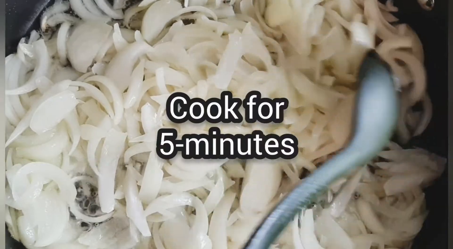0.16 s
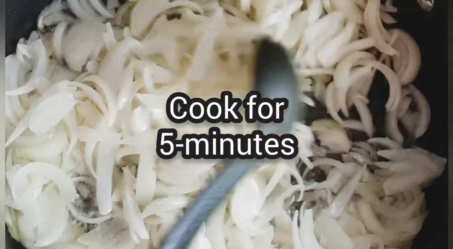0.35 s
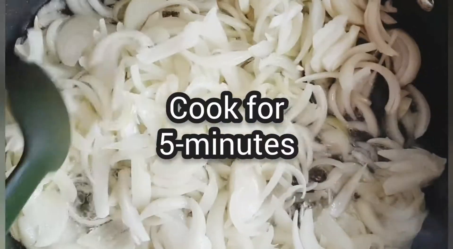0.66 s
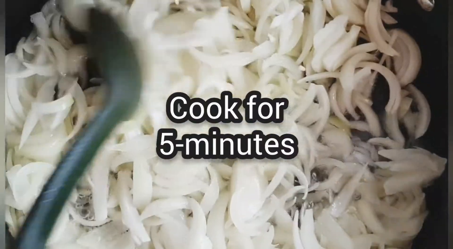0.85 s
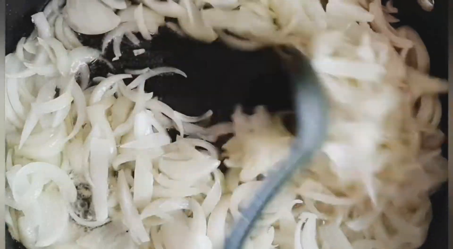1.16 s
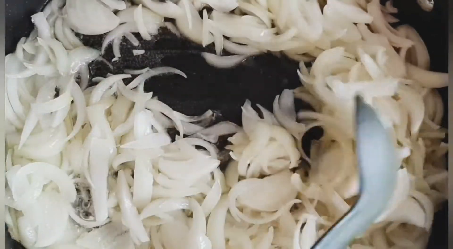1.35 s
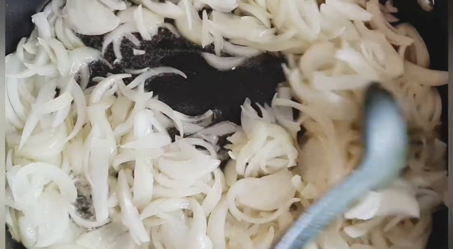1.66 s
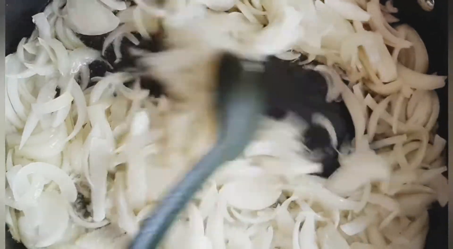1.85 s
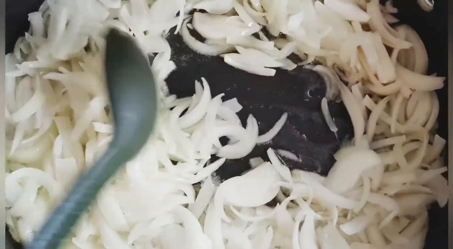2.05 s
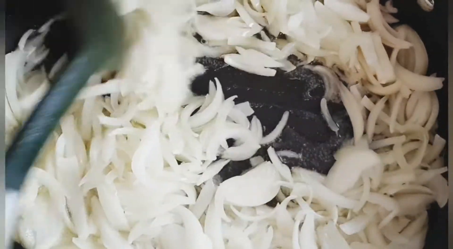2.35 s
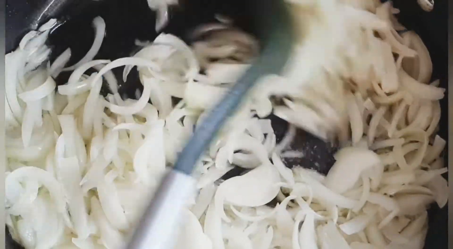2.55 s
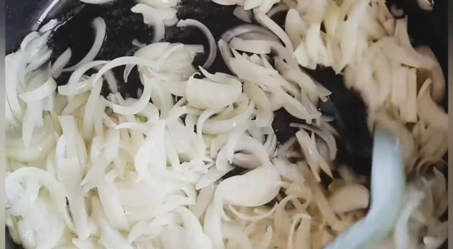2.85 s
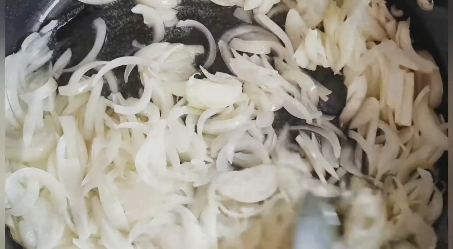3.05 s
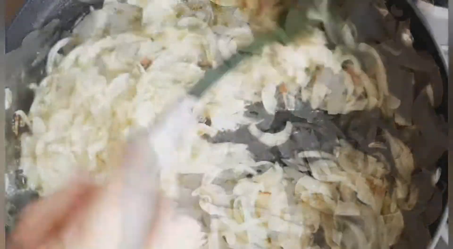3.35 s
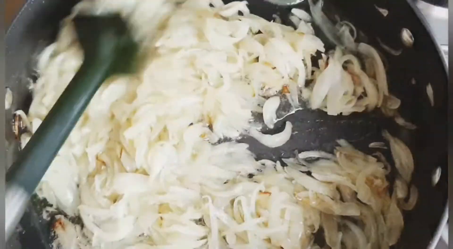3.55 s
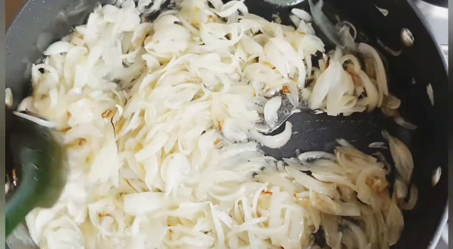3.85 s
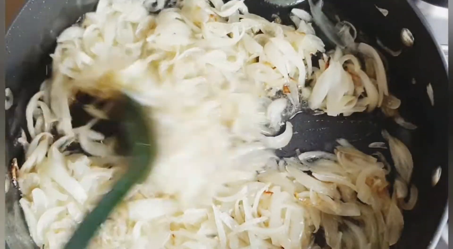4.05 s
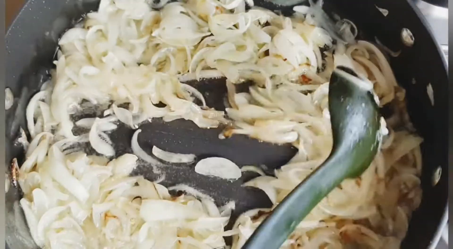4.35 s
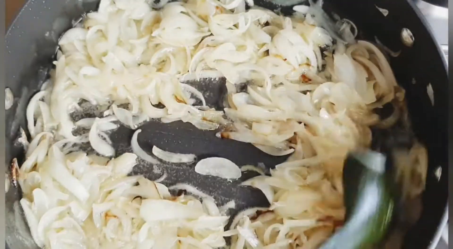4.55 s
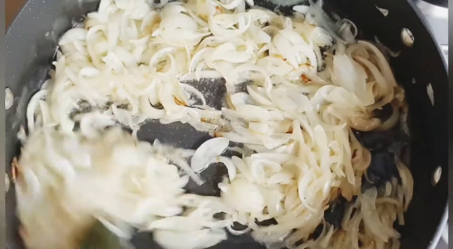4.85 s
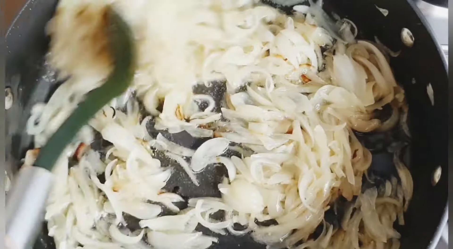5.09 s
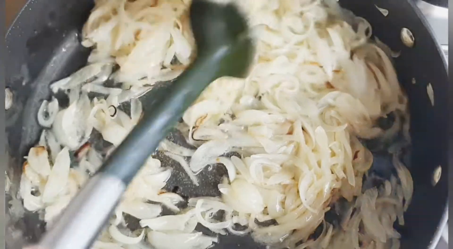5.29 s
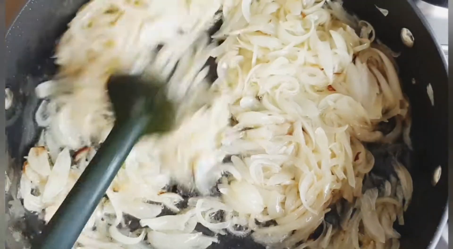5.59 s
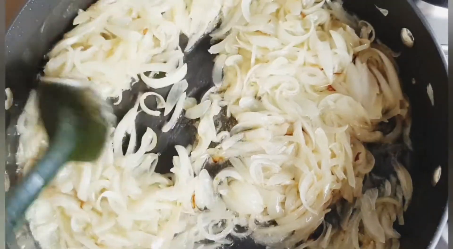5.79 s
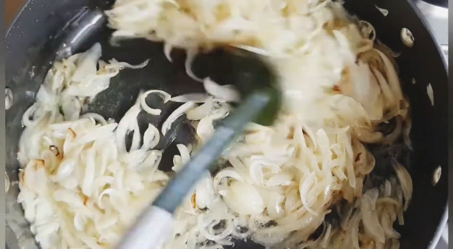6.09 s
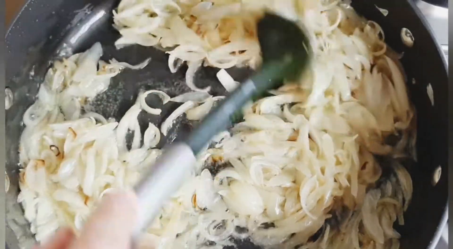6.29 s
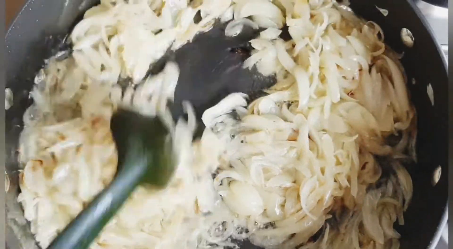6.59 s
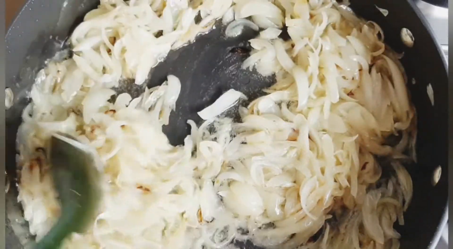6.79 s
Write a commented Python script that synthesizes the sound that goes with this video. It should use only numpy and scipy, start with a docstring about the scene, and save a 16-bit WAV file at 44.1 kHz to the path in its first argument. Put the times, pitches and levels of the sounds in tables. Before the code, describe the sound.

Close, bright frying hiss of onions grows drier and spittier while a soft-edged spatula stirs, scrapes and taps the pan.

```python
"""In a kitchen, sliced onions fry in hot oil in a deep pan, heard from close above by two microphone ports.
Water flashing to steam makes the sizzle, as filtered noise in countless tiny bursts, and some big spits.
A spatula drags over the pan floor (grainy noise), chatters (narrow noise) and knocks (pulses into resonances).
Rising steam buffets mostly the right port (low noise), two droplets strike the ports (single pulses),
and the kitchen hums below (low noise and narrow bands)."""
import sys
import numpy as np
from scipy import signal
from scipy.fft import rfft, irfft, next_fast_len
from scipy.io import wavfile
from scipy.ndimage import uniform_filter1d

SR = 44100
rng = np.random.default_rng(int(sys.argv[2]) if len(sys.argv) > 2 else 0)


def dump_mix(stems):
    """Bounce the given channels to the path in sys.argv[1] as a 16-bit WAV at rate SR."""
    frames = np.atleast_2d(stems).T  # one column per channel
    limited = np.clip(frames, -1, 1)  # hard clip at full scale
    pcm = np.round(limited * 32767).astype(np.int16)
    wavfile.write(sys.argv[1], SR, pcm)


N = 305613  # length of the scene in samples

# colour of the low room noise: f/Hz, density/dB per Hz
KITCHEN_SPECTRUM = [(15, -37), (25, -18), (54, 4.5), (75, -6.5), (124, 0.5), (204, -14.5), (276, -7.5),
                    (400, -2.5), (520, -11.5), (880, -120)]
KITCHEN_LEVEL_DB = -59.5
# wavering hums: f/Hz, width/Hz, rms level/dB
HUMS = [(49.9, 5.7, -70), (634.5, 8, -65)]
# gusts of steam on the right port: t of the top/s, half length/s, level before the last filter/dB
STEAM_GUSTS = [(0.01, .03, -51), (0.35, 0.12, -51.5), (0.57, 0.026, -52), (0.74, 0.023, -47),
               (0.846, 0.045, -38), (0.992, 0.017, -37), (1.203, 0.037, -50), (1.628, 0.057, -39.5),
               (1.818, .03, -47), (1.93, 0.1, -47), (2.38, 0.12, -45.5), (3.012, 0.066, -44.5),
               (3.407, 0.038, -50)]
# droplets on the ports, before filtering: t/s, signed height left, signed height right, width/ms
DROPLET_HITS = [(0.873, -0.012, .06, 0.62), (6.7519, -0.51, 0.023, 0.16)]
# spatula knocks on the pan: t/s, push level before the filters/dB, ring against push/dB, left-right/dB
SPATULA_KNOCKS = [(1.010, -32, -6, -1.0), (1.407, -30.5, -6, 1), (1.706, -36, 12, 0), (2.38, -26, -21, 9),
                  (3.913, -27.5, -26, -1), (4.300, -39, 0, 10), (4.640, -32, -4, 12),
                  (5.100, -33.5, -8, 12), (5.375, -35, 7, -1), (5.558, -31, -1, -7), (5.682, -35, -16, 17),
                  (6.058, -28.5, 7, 1.0), (6.120, -25.5, -19, -1.0), (6.624, -36, -2, 1.0),
                  (6.644, -26.5, 4, 0.0)]
# resonances of the pan body: f/Hz, width/Hz, level/dB
PAN_MODES = [(638, 93, -10.5), (830, 64, -6), (1023, 146, -4.5), (1480, 51, 3), (1551, 61, -1),
             (2047, 57, 0.5)]
# short pitched strokes of the spatula edge: t/s, length/s, start f/Hz, end f/Hz, width/Hz, level/dB
EDGE_STROKES = [(1.28, 0.13, 110, 111, 49.8, -55.5), (2.352, 0.098, 243, 255, 70, -52),
                (3.99, 0.14, 920, 743, 170, -46), (4.33, 0.063, 122, 118, 60, -60),
                (4.456, 0.13, 131, 122, 60, -55.5), (4.636, 0.08, 265, 273, 100, -50),
                (5.656, 0.079, 170, 170, 100, -63), (6.829, 0.15, 744, 1015, 200, -45.5)]
# onions shifting on the pan floor all the while: t/s, hollow level/dB, ringing level before damping/dB
ONION_RUB = [(0.0, -49.5, -41), (1.2, -47.5, -41), (2.3, -48, -41), (2.9, -51.5, -42), (3.7, -55.5, -44),
             (4.3, -51.5, -39), (5.0, -52.5, -41), (5.8, -50.5, -42.5), (6.93, -53.5, -42)]
# drags of the spatula over the floor: t of the top/s, rise/s, fall/s, hollow level/dB, ringing level/dB
SPATULA_DRAGS = [(2.386, .01, 0.091, -45, -75), (2.53, 0.086, 0.13, -32, -75), (3.33, .02, 0.053, -60, -44),
                 (3.672, 0.016, 0.026, -51, -43.5), (3.84, 0.025, .03, -61, -42.5),
                 (3.93, 0.019, .04, -51, -60), (4.31, 0.063, 0.094, -80, -40), (4.53, .06, 0.066, -54, -51),
                 (4.65, .015, 0.14, -53, -35), (4.82, 0.12, 0.062, -44.5, -38),
                 (5.0, 0.014, 0.03, -50, -44), (5.11, 0.03, 0.044, -69, -39), (5.21, 0.025, 0.11, -64, -48),
                 (5.995, .07, 0.034, -36.5, -32.5), (6.06, .015, 0.018, -50, -43),
                 (6.13, 0.018, 0.035, -48, -43.5), (6.21, 0.013, 0.058, -60, -43),
                 (6.64, 0.016, 0.014, -47, -44), (6.93, 0.035, 0.024, -50, -59)]
# colour of the hollow rush in the pan's cup: f/Hz, density/dB per Hz
HOLLOW_SPECTRUM = [(120, -58), (200, -28), (404, -15), (470, -3), (604, -1.5), (715, -2), (877, -3),
                   (1040, -8), (1280, -10), (1500, -18), (1800, -30), (2530, -100)]
# big spits of oil: t/s, peak level/dB, centre f/Hz, left-right/dB, puff against crack/dB
OIL_SPITS = [(0.625, -19.5, 6300, 2, -11), (0.8717, -9.5, 12800, -4, -15), (0.9395, -25, 4140, -10, -14),
             (0.982, -20, 4120, -4, -12), (1.8705, -19.5, 13800, -5, -7), (2.2507, -21, 2680, -1, -7),
             (2.544, -22, 4000, -8, -7), (3.0702, -21.5, 3470, 1, -7), (3.3348, -26, 4420, -6, -7),
             (3.645, -13, 15100, 2, -5), (3.8316, -22, 7680, -4, -7), (4.1728, -17, 12800, 1, -5),
             (4.2397, -19, 10800, 0, -7), (4.4232, -19, 7180, 2, -7), (4.471, -19, 5340, -1, -3),
             (4.511, -12, 13800, 1, -7), (4.823, -20, 3520, -1, -5), (4.832, -16, 7030, -1, -10),
             (4.862, -15, 9000, -1, -10), (5.048, -18.5, 3460, -1, -5), (5.0991, -14, 3180, 0, -12),
             (5.284, -14, 6760, 1, -4), (5.402, -13.5, 7100, 1, -4), (5.653, -19.5, 5630, -1, -7),
             (5.676, -12, 14800, 0, -7), (5.712, -17.5, 6840, -2, -4), (5.84, -18, 5700, 0, -2),
             (6.0057, -15.5, 11600, -3, -6), (6.098, -15.5, 5530, -4, -9), (6.1518, -19.5, 6860, -5, -1),
             (6.2061, -15, 5500, -3, -7), (6.286, -19.5, 5640, -3, -5), (6.3808, -19, 7160, 2, -7),
             (6.4882, -14, 13000, -1, -7), (6.521, -17, 4870, 1, -12), (6.6446, -12.5, 6800, -1, -6),
             (6.7006, -20, 13100, 0, -5), (6.8418, -17, 11850, -1, -4), (6.8645, -23, 3540, 0, -7)]
SPIT_BROAD_SHARE = .22  # part of a spit that spans a wide range of pitches
# the frying before flares: t/s, sizzle level/dB, level of the top against it/dB
FRYING = [(0.0, -39.5, -1.5), (0.46, -40.5, -1), (0.83, -40, 2), (0.95, -37, 0.5), (1.3, -36.5, 1.5),
          (1.62, -40.5, 1), (1.8, -37, 0), (2.07, -39.5, -0.5), (2.45, -36.5, -0.5), (3.28, -40, -1.5),
          (3.5, -38.5, -0.5), (4.1, -37.5, -1.5), (4.65, -35.5, -1), (4.85, -31.5, 1), (4.96, -36.5, 1),
          (5.02, -33, -0.5), (5.6, -35.5, 1.5), (5.72, -35, 0.5), (5.92, -36, 0), (6.18, -36.5, -1),
          (6.45, -36.5, 1), (6.7, -37.5, -0.5), (6.93, -34.5, -1.5)]
# colours of the sizzle, the first heard early on, the second later; each: f/Hz, density/dB per Hz
SIZZLE_SPECTRA = [(1060, -42), (1800, 0), (1990, 3), (2220, -1), (3480, 0), (4250, 1.5), (8750, -13.5),
                  (11800, -5), (15100, -13.5), (16000, -2)], [(1060, -6), (1800, -10.5), (2050, -13),
                  (2410, -4.5), (2790, -2.5), (7420, 2), (8670, -13.5), (11500, -4), (15100, -5),
                  (16000, 0)]
# flares where wet onion meets bare pan, and a few short dips: t of the top/s, change of level/dB
SIZZLE_FLARES = [(0.77, 2), (1.35, 4.5), (1.75, 2.5), (2.27, 3), (4.15, 4), (4.38, -0.5), (4.82, 2.5),
                 (5.29, 2), (5.34, 2), (5.52, 3), (6.02, 5), (6.1, -2.5), (6.16, -2), (6.21, 1.5),
                 (6.52, 3), (6.64, 4.5), (6.76, 2)]
FLARE_RISE_S, FLARE_FALL_S, FLARE_TREBLE_SHARE = 0.011, 0.021, .3
# stage of the scene: t/s, share of the later character from 0 to 1, left-right of the sizzle/dB
SCENE_STAGE = [(0, 0.6, -1.5), (1.2, 0.45, -3), (3.1, 0.52, -1.7), (3.5, 0.72, -0.5), (6.93, 0.82, 0)]
TOP_FROM_HZ, CUTOFF_HZ = 8250, 15780  # where the sizzle's top begins; where the whole sound is cut


def from_db(db):
    """Decibels to gain."""
    return 10 ** (np.asarray(db) / 20)


def rms_one(x):
    """Scaled to rms 1."""
    return x / np.sqrt(np.mean(x ** 2) + 1e-20)


def in_time(rows):
    """Each column of a curve table at every sample."""
    s, *columns = np.transpose(rows)
    return [np.interp(np.arange(N) / SR, s, column, right=column[-1]) for column in columns]


def drift(rate):
    """Slow random wandering of spread 1; a higher rate in Hz wanders faster."""
    r = np.exp(-80 * np.pi * rate / SR)  # computed at every 40th sample only
    white = rng.standard_normal(N // 40 + 2002)
    slow = signal.lfilter([1], [1, -2 * r, r * r], white)[2000:]
    return np.interp(np.arange(N) / 40, np.arange(len(slow)), rms_one(slow))


def colour(x, spectrum):
    """Gives white sound a spectrum; rms 1."""
    size = next_fast_len(N)
    hz, db = np.transpose(spectrum)
    bin_hz = np.arange(1, size // 2 + 2) * SR / size
    gain = from_db(np.interp(np.log(bin_hz), np.log(hz), db, left=-90, right=-90))
    return rms_one(irfft(rfft(x, size) * gain, size)[..., :N])


def band(x, low_hz, high_hz, order=2):
    """Keeps the pitches between two limits (Butterworth band-pass)."""
    sos = signal.butter(order, [low_hz, min(high_hz, .45 * SR)], "band", fs=SR, output="sos")
    return signal.sosfilt(sos, x)


def pair(alike):
    """Two white noises, left and right, with the given likeness."""
    mid, side = rng.standard_normal((2, N))
    alike = np.clip(alike, 0, 1)
    return np.sqrt((1 + alike) / 2) * mid + np.sqrt((1 - alike) / 2) * side * [[1], [-1]]


def bursts(per_s, spread_db, decay_ms):
    """Power envelope of random sudden bursts that die fast, mean 1."""
    sizes = from_db(2 * spread_db * np.minimum(rng.exponential(1, N), 3))
    starts = sizes * (rng.random(N) < per_s / SR)
    power = signal.lfilter([1], [1, -np.exp(-1000 / (decay_ms * SR))], starts + 1e-12)
    return power / power.mean()


def sides(pan_db):
    """Left and right gain."""
    return from_db(np.array([[pan_db], [-pan_db]]) / 2)


def narrow(hz, width, size):
    """Noise in a narrow band whose centre follows hz sample by sample; rms 1."""
    lowpass = signal.butter(2, width / 2, fs=SR, output="sos")
    slow = signal.sosfilt(lowpass, rng.standard_normal((2, size + 8000)))[:, 8000:]
    turning = np.exp(2j * np.pi * np.cumsum(hz * np.ones(size)) / SR)
    return rms_one(np.real((slow[0] + 1j * slow[1]) * turning))


def swells(tops_s, heights, rise_s, fall_s):
    """Peaked swells summed; each is near a third of its height rise_s before and fall_s after its top."""
    late = np.arange(0, N + 32, 32) / SR - np.reshape(tops_s, (-1, 1))  # every 32nd sample is enough
    span = np.where(late < 0, np.reshape(rise_s, (-1, 1)), np.reshape(fall_s, (-1, 1)))
    curve = heights @ np.exp(-np.abs(late / span) ** 1.5)
    return np.interp(np.arange(N) / 32, np.arange(late.shape[1]), curve)


def kitchen():
    """Low room noise, nearly alike at both ports, and wavering hums."""
    hum = sum(from_db(db) * narrow(hz, width, size=N) for hz, width, db in HUMS)
    return from_db(KITCHEN_LEVEL_DB) * colour(pair(0.86), KITCHEN_SPECTRUM) + hum


def buffeting():
    """Rising steam flaps the ports, mostly the right, one slow push after another; it ends midway."""
    flap = band(rng.standard_normal((2, N)), 38, 96)
    flap = flap / np.sqrt(uniform_filter1d(flap ** 2, size=1200) + 1e-9)  # pushes of even size
    s, half_s, db = np.transpose(STEAM_GUSTS)
    gusts = flap * swells(s, from_db(db), half_s, half_s)
    return band(gusts, 23, 150) * from_db([[-14.], [0]])


def droplets():
    """One-sided pressure pulses; the membrane swings back slowly."""
    t = np.arange(N) / SR
    out = np.zeros((2, N))
    for s, left, right, ms in DROPLET_HITS:
        pulse = np.exp(-((t - s) * 2000 / ms) ** 2)
        out += pulse * np.array([[left], [right]])
    return band(out, 110, 9000, order=1)  # the lower limit makes the swing back


def pan_body(x):
    """The pan's resonances side by side, each ringing at its own pitch."""
    out = 0
    for k, (hz, width, db) in enumerate(PAN_MODES):
        r = np.exp(-np.pi * width / SR)
        ringing = signal.lfilter([1 - r, 0, r - 1], [1, -2 * r * np.cos(2 * np.pi * hz / SR), r * r], x)
        out = out + (-1) ** k * from_db(db) * ringing
    return out


def knocks():
    """A soft plastic edge: a dull push heard directly and through the pan's modes."""
    push, strike = np.zeros((2, 2, N))
    for s, db, ring_db, pan_db in SPATULA_KNOCKS:
        at = [round(s * SR)]
        push[:, at] = from_db(db) * sides(pan_db)
        strike[:, at] = push[:, at] * from_db(ring_db)
    return 22.0 * band(push, 335, 1330) + 26.0 * pan_body(strike) + 2.8 * band(strike, 1000, 2200)


def strokes():
    """The spatula edge chatters at a gliding pitch, swelling fast and fading."""
    out = np.zeros(N + SR)
    for s, length, start_hz, end_hz, width, db in EDGE_STROKES:
        gone = np.arange(14000) / SR / length  # share of the stroke gone by
        shape = np.sin(np.pi * np.clip(gone, 0, 1) ** 1.05) ** 0.32
        chatter = narrow(start_hz + (end_hz - start_hz) * gone, width, size=len(gone))
        at = round(s * SR)
        out[at:at + len(gone)] += from_db(db) * shape * chatter
    return out[:N]


def drags():
    """Gains of the friction: hollow part, steady ringing part, and the ringing that the drags add."""
    s, rise_s, fall_s, hollow_db, ring_db = np.transpose(SPATULA_DRAGS)
    steady_hollow, steady_ring = from_db(in_time(ONION_RUB))
    hollow = steady_hollow + swells(s, from_db(hollow_db), rise_s, fall_s)
    return hollow, steady_ring, swells(s, from_db(ring_db), rise_s, fall_s)


def rubbing(hollow_gain, ring_gain, drag_gain, dry):
    """Grainy friction: a hollow rush from the pan's cup, and its modes, which ring stronger later on."""
    rush = pair(0.64) * np.sqrt(0.5 + .5 * bursts(per_s=90., spread_db=5.5, decay_ms=9.6))
    hollow = colour(rush, HOLLOW_SPECTRUM)
    grain = pair(0.28) * np.sqrt(1 + 0.4 * bursts(per_s=120., spread_db=6.0, decay_ms=4.6))
    ringing = rms_one(band(pan_body(grain), 1130, 2400))
    modes = (0.16 + 0.85 * dry ** 2) * from_db(2.8 * drift(4.0)) * ringing
    scratch = (.7 - 0.25 * dry) * rms_one(band(grain, 995, 2680))
    # the spatula on bare metal: a denser rasp, heard through the modes only
    rasp = pair(0.45) * np.sqrt(1.5 + 0.7 * bursts(per_s=230.0, spread_db=-0.5, decay_ms=6.0))
    drag = rms_one(band(pan_body(rasp), 950, 2080))
    return hollow_gain * hollow + ring_gain * (modes + scratch) + drag_gain * drag


def spits():
    """The bubble cracks, then a short puff of noise around its pitch dies away."""
    out, t = np.zeros((2, N + 1000)), np.arange(1000) / SR
    noises = rng.standard_normal((len(OIL_SPITS), 2, 1000))
    for (s, db, hz, pan_db, puff_db), noise in zip(OIL_SPITS, noises):
        noise[:, 0] = 3.0 * np.sign(noise[0, 0])  # a strong first sample, the same at both ports
        crack_decay, puff_decay = np.exp(-t / 0.00012), np.exp(-t / 0.011)
        spit = noise * (crack_decay + from_db(puff_db) * puff_decay)
        spit = band(spit, hz / 1.3, hz * 1.264) + SPIT_BROAD_SHARE * band(spit, 1900, 12800)
        at = round(s * SR)
        out[:, at:at + 1000] += from_db(db) * sides(pan_db) * spit / np.abs(spit).max()
    return out[:, :N]


def sizzle(level_db, bright_db, flare_db, dry):
    """Each third-octave holds a fine hiss, bubbles of its own size bursting, and bursts that span all bands."""
    white, out = rng.standard_normal((2, 2, N)), 0  # the ports hear unrelated detail but the same bursts
    wide, together = bursts(per_s=22.0, spread_db=12.5, decay_ms=1.3), drift(19.0)
    edges_hz = 1500 * 2 ** np.arange(0, 4, 1 / 3)
    for k, (low, high) in enumerate(zip(edges_hz, edges_hz[1:])):
        own = bursts(per_s=50., spread_db=6.5, decay_ms=0.33)
        wander_db = 0.82 * together + 1.48 * drift(20.6)
        gain = np.sqrt(1 + 0.017 * wide + 0.087 * own) * from_db(wander_db)
        out = out + gain * band(white[k % 2], low, high)
    early_spectrum, late_spectrum = SIZZLE_SPECTRA
    out = (1 - dry) * colour(out, early_spectrum) + dry * colour(out, late_spectrum)
    # body and top are levelled apart; a flare lifts the top less
    body, top = band(out, 1000, TOP_FROM_HZ, order=12), band(out, TOP_FROM_HZ, 19000, order=12)
    body = from_db(flare_db) * body / np.std(band(out, 1940, 10700, order=4))
    top = from_db(bright_db + FLARE_TREBLE_SHARE * flare_db) * rms_one(top)
    return from_db(level_db) * (body + top)


def scene():
    """All sources at the two ports."""
    dry, pan_db = in_time(SCENE_STAGE)
    flare_db = swells(*np.transpose(SIZZLE_FLARES), FLARE_RISE_S, FLARE_FALL_S)
    left_right = from_db(np.array([pan_db, -pan_db]) / 2)
    background = kitchen() + buffeting() + droplets()
    spatula_and_onions = knocks() + strokes() + rubbing(*drags(), dry)
    frying = spits() + sizzle(*in_time(FRYING), flare_db, dry) * left_right
    return background + spatula_and_onions + frying


def record(dry):
    """The top is cut steeply, by 60 dB, with 0.3 dB of ripple below the cut."""
    return signal.sosfilt(signal.ellip(12, .3, 60, CUTOFF_HZ, fs=SR, output="sos"), dry)


dry = scene()
out = record(dry)
dump_mix(out)
```